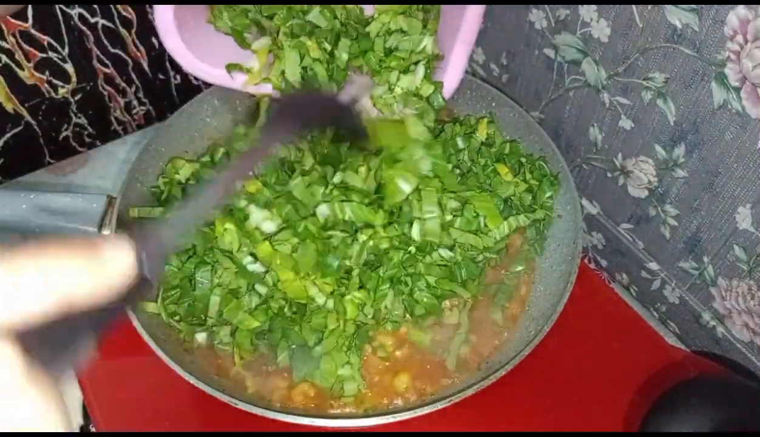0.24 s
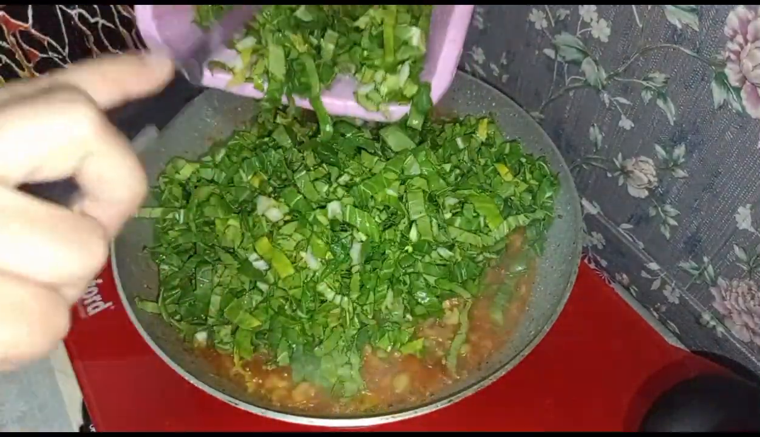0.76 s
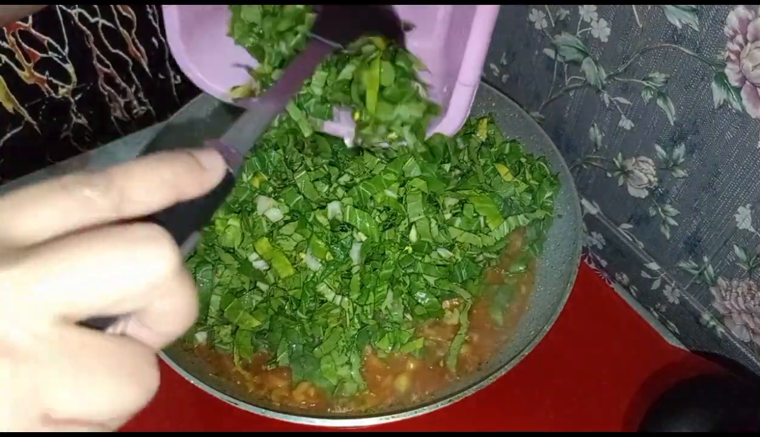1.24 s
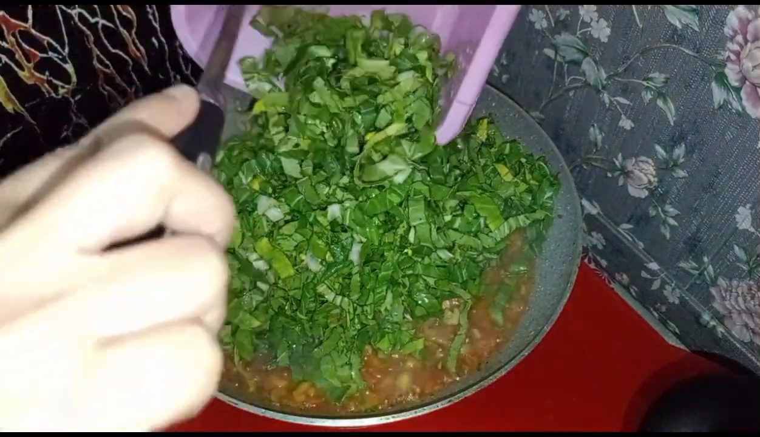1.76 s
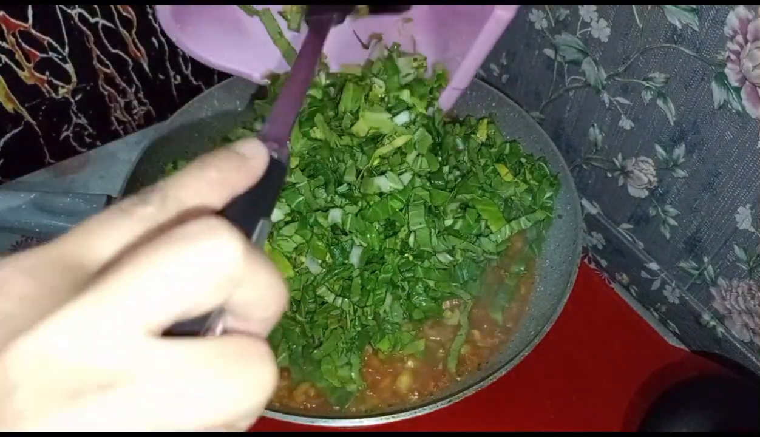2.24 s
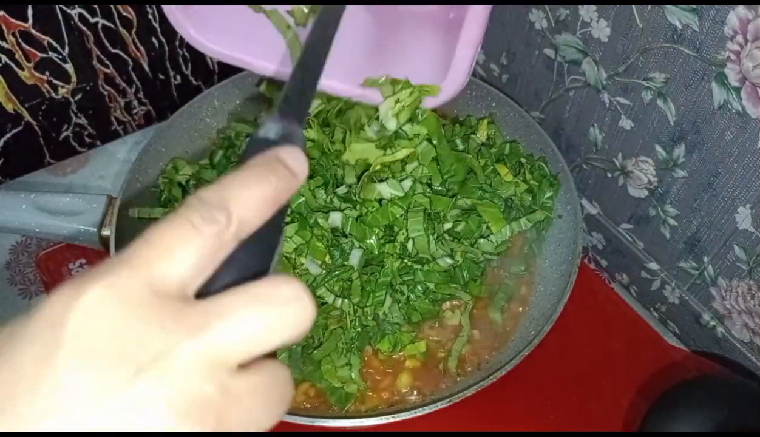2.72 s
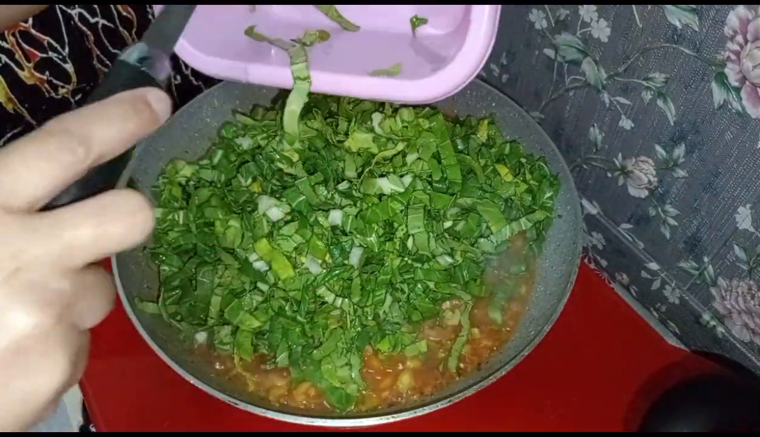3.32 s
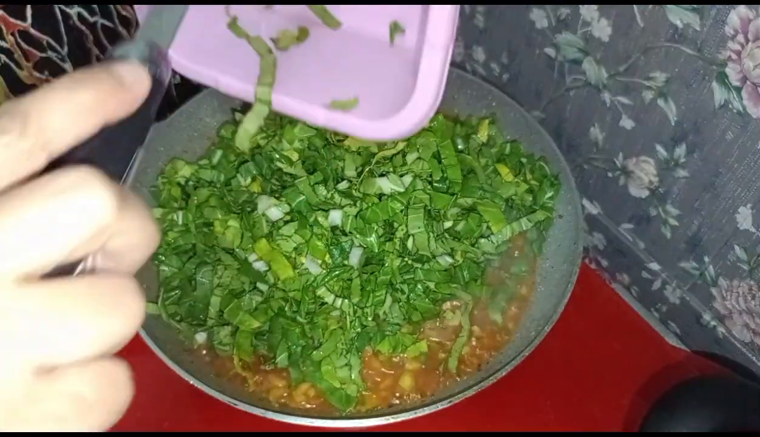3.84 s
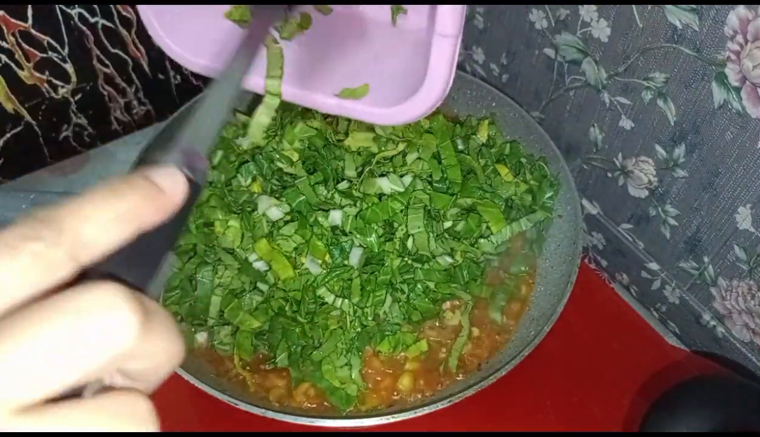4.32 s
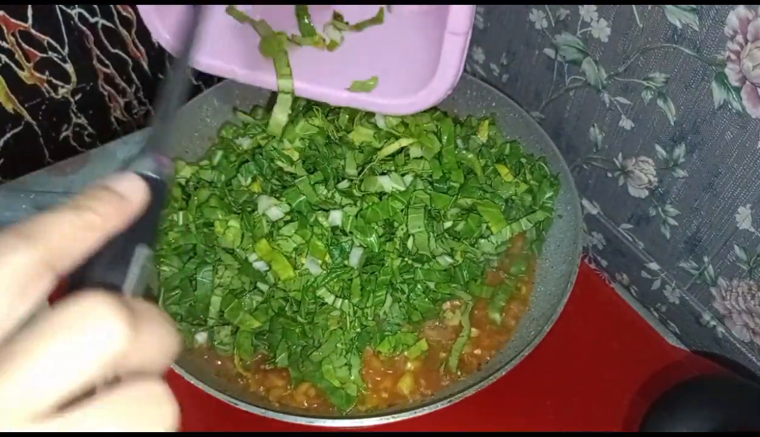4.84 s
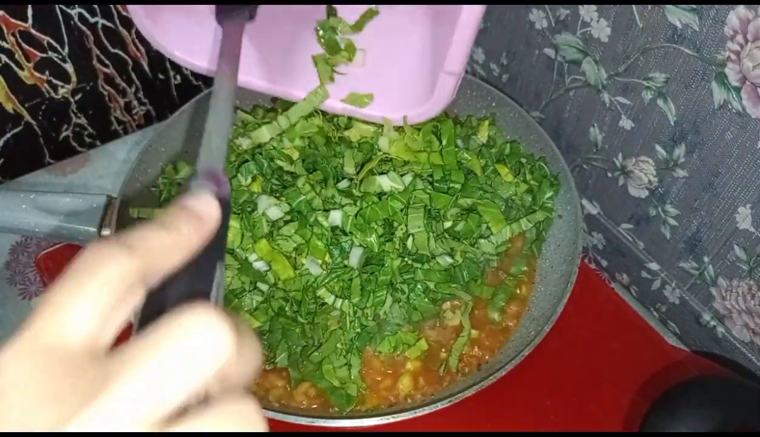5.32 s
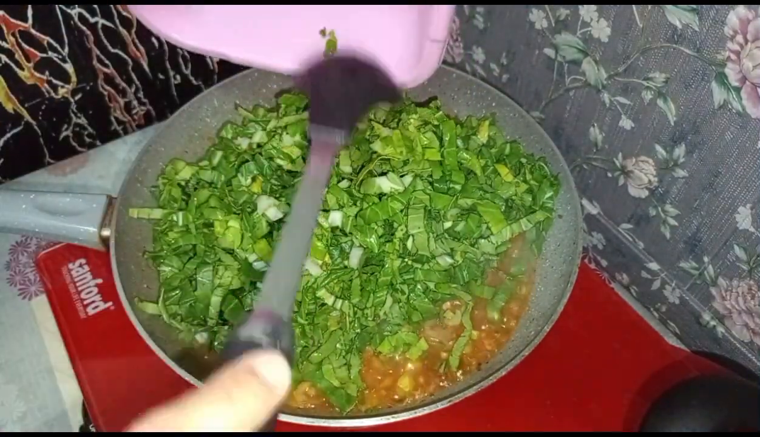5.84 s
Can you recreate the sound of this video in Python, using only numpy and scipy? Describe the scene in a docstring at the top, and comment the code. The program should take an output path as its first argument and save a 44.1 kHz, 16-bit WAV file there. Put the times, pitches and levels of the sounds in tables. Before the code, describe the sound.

Continuous bubbling sizzle with faint oil spits and a barely audible low hum. Over it, sharp dry plastic clacks and scraping strokes as leaves are pushed from a tub, with tiny squeaks and low handling rumbles. The knocks come unevenly, the hardest near the middle, then thin out. Close, mono, dry kitchen sound; automatic gain pushes the simmer down after each blow and peaks clip.

```python
"""A spatula knocks and scrapes chopped leaves out of a plastic tub into a pan of simmering sauce.
Each knock or scrape shakes the tub, which rings at a few pitches and soon goes quiet.
The pan's fizz is shaped noise and clicks; a faint stove hum, oil spits and leaf rustles are noise too.
Thin squeaks are short tones, and the swaying tub rumbles low.
The close microphone's gain control ducks the fizz after each knock and the loudest blows clip."""
import sys
import numpy as np
from scipy import signal
from scipy.io import wavfile
from scipy.ndimage import uniform_filter1d, minimum_filter1d

SR = 44100
rng = np.random.default_rng(int(sys.argv[2]) if len(sys.argv) > 2 else 0)


def put_to_file(sound):
    """Save the sound as 16-bit audio at rate SR, in the file named by the first command-line argument."""
    columns = np.atleast_2d(sound).T  # one column per channel
    safe = np.clip(columns, -1, 1)
    whole_steps = np.round(safe * 32767)
    wavfile.write(sys.argv[1], SR, whole_steps.astype(np.int16))


N = 267815  # length of the sound in samples


def amp(db):
    """Turn decibels into a plain multiplier."""
    return 10 ** (np.asarray(db) / 20)


def evened(x):
    """Scale a signal to an average (RMS) strength of 1."""
    return x / np.sqrt(np.mean(x ** 2) + 1e-20)


def curve(rows):
    """Join a table's rows with straight lines: each column after the time, at every sample."""
    s, *columns = np.transpose(rows)
    return [np.interp(np.arange(N) / SR, s, column) for column in columns]


def mode(x, hz, width):
    """One pitch at which a thing rings: a click starts a tone about 1 high; more width, faster fading."""
    radius = np.exp(-np.pi * width / SR)
    angle = 2 * np.pi * hz / SR
    return signal.lfilter([0, np.sin(angle)], [1, -2 * radius * np.cos(angle), radius ** 2], x)


def band(x, lo_hz, hi_hz):
    """Keep mainly the sound between two pitches."""
    return signal.sosfilt(signal.butter(2, [lo_hz, hi_hz], "bandpass", fs=SR, output="sos"), x)


def ring(x, hz, width):
    """A mode that only the part of the blow near its own pitch excites, so it swells in softly."""
    return mode(band(x, 0.865 * hz, 1.35 * hz), hz, width)


def clicks(per_s, spread_db):
    """Random clicks of either sign; a few are much larger."""
    size = amp(spread_db * np.minimum(rng.exponential(1, N), 5))
    signed = size * rng.choice([-1., 1.], N)
    return evened(signed * (rng.random(N) < per_s / SR))


# Simmer strength over time: t/s, level/dB, treble lift/dB (grows from 2.5 kHz, full from 5 kHz up)
SIMMER_STRENGTH = [(0, -18, -7), (.5, -16.5, -8.5), (1.2, -16, -8), (1.8, -17.5, -9.5), (2.4, -19, -7),
                   (3, -17.5, -10), (3.6, -19.5, -8), (4.2, -16.5, -9.5), (4.8, -18, -9.5),
                   (5.4, -24.5, -6), (6.07, -22, -7.5)]
# Broad colour of the fizz: f/Hz, relative level/dB per Hz
FIZZ_COLOUR = [(76, -72), (130, -22), (147, -16.5), (232, -28.5), (267, -30), (391, -19), (478, -28),
               (645, -17.5), (871, -15), (1750, -3), (2890, -11.5), (3130, -14.5), (9060, -27.5),
               (11500, -42), (15600, -43.5)]
# Resonances of the pan in the fizz: f/Hz, width/Hz, level/dB added at the peak
PAN_PEAKS = [(627.5, 57, 12.5), (1313, 33, 11), (1930, 130, 4.5), (3190, 56, 4), (4400, 42, 6.5),
             (6280, 980, 3), (8990, 700, 6.5), (15000, 1000, 13.5)]


def simmer():
    """Thousands of small bubbles burst each second, coloured by the pan, in drifting patches."""
    level_db, treble_db = curve(SIMMER_STRENGTH)
    bursts = clicks(5000, 1.0) + 1.44 * rng.standard_normal(N)
    # split the sound into pitches (rows) and short moments (columns)
    hz, t, z = signal.stft(bursts, SR, nperseg=512, noverlap=384)

    colour_hz, value_db = np.transpose(FIZZ_COLOUR)
    colour_db = np.interp(np.log(hz + 1), np.log(colour_hz), value_db, -55)
    for centre, width, db in PAN_PEAKS:
        colour_db += db / (1 + (2 * (hz - centre) / width) ** 2)

    patches = uniform_filter1d(rng.standard_normal(z.shape), 6, 0)  # smooth over pitch
    patches = evened(uniform_filter1d(patches, 9, 1))  # then over time
    depth_db = np.interp(hz, [2000, 5000], [1.4, 2.3])[:, None]  # the treble is patchier
    flicker = evened(uniform_filter1d(rng.standard_normal(len(t)), 6))
    treble_share = np.clip(np.log2((hz[:, None] + 1) / 2500), 0, 1)
    lift_db = np.interp(t * SR, np.arange(N), treble_db) * treble_share

    z = z * amp(colour_db[:, None] + depth_db * patches + 0.67 * flicker + lift_db)
    fizz = signal.istft(z, SR, nperseg=512, noverlap=384)[1][:N]
    return amp(level_db) * evened(fizz)


HUM_HZ, HUM_DB = 118.4, -50


def stove():
    """A narrow wavering hum: noise rings one low pitch."""
    return amp(HUM_DB) * evened(mode(rng.standard_normal(N), HUM_HZ, 6))


SPITS_PER_S, SPITS_DB = 25, -58


def spits():
    """Sparse droplets of oil snap: short, faint puffs of noise."""
    t = np.arange(900) / SR
    fade = amp(-60 * t / .015)  # 60 dB in 15 ms
    puffs = signal.oaconvolve(abs(clicks(SPITS_PER_S, 2.0)), fade)[:N]
    return amp(SPITS_DB) * evened(band(puffs * rng.standard_normal(N), 3500, 9000))


RUSTLES_PER_S, RUSTLES_DB = 26, -50  # all pitches together
# Pitches of the sliding leaves: f/Hz
RUSTLE_PITCHES = [3760, 4120, 5600, 5960]


def rustles():
    """Leaves slide at random and give brief fuzzy chirps at a few high pitches."""
    t, out = np.arange(2000) / SR, np.zeros(N)
    puff = t * amp(-60 * t / .06)  # swells, then fades
    for hz in RUSTLE_PITCHES:
        starts = abs(clicks(RUSTLES_PER_S / len(RUSTLE_PITCHES), 2.0))
        slides = signal.oaconvolve(starts, puff)[:N]
        out += slides * evened(mode(rng.standard_normal(N), hz, 150))
    return amp(RUSTLES_DB) * evened(out)


# Brief rings of the tub and thin squeaks as the blade sticks and slides:
# start t/s, length/s, f/Hz, level/dB at the peak
SQUEAK_TONES = [(0.039, 0.18, 6050, -33), (0.056, 0.039, 4350, -25), (0.358, .009, 3490, -6),
                (0.551, 0.0096, 288, 2.5), (0.5542, 0.012, 702.6, -1), (0.53, .029, 4480, -28),
                (0.574, 0.017, 740, -10), (0.591, 0.021, 699, -7), (0.616, 0.031, 705, -12),
                (0.733, 0.044, 198, -33), (0.943, 0.013, 780, -10), (0.959, 0.058, 515, -9.5),
                (0.96, 0.021, 773, -2.5), (1.01, 0.054, 198, -21), (1.115, .031, 4550, -25.5),
                (1.427, .027, 237.5, -8.5), (1.447, 0.049, 184, -20), (1.539, 0.027, 6300, -25),
                (1.541, 0.022, 360, -4), (1.545, 0.038, 5750, -25), (1.583, 0.049, 446, -18),
                (1.677, 0.077, 4470, -29), (1.73, .037, 6050, -32), (1.763, 0.028, 4450, -24),
                (1.793, 0.017, 4400, -30), (1.869, 0.018, 335, -3.5), (1.88, .06, 700, -28),
                (1.945, 0.015, 3996, -16.5), (1.952, 0.044, 4050, -24), (1.96, 0.088, 329, -27),
                (2.352, 0.033, 5570, -35), (2.367, 0.02, 3260, -9), (2.37, 0.038, 528, 5),
                (2.404, 0.084, 600, -16.5), (2.76, 0.021, 347.7, 1), (2.802, .022, 377, -2),
                (2.852, 0.021, 700, 6), (2.89, .011, 700, -6), (2.913, 0.048, 700, -2),
                (2.96, 0.014, 700, -2), (3.056, 0.018, 720, -6), (3.064, 0.037, 175.8, -13.5),
                (3.152, 0.017, 4270, -25), (3.181, .009, 1550, 2), (3.218, 0.091, 690, -19),
                (3.377, 0.037, 520, -5), (3.943, 0.03, 235, -16), (3.944, .05, 2990, -16),
                (4.051, .022, 319, -3), (4.245, 0.022, 515, -3.5), (4.281, .0049, 8500, -17),
                (4.373, 0.028, 700, 3), (4.405, 0.049, 694, -9.5), (4.629, 0.015, 4390, -21),
                (4.632, 0.041, 4130, -31.5), (5.323, .03, 372.6, -5.5), (5.333, 0.013, 2760, -9),
                (5.438, 0.05, 235, -17.5), (5.463, 0.12, 235, -27), (5.627, 0.061, 535, -17),
                (5.844, .011, 3500, -27), (6.007, 0.0077, 3010, 2.5), (6.0075, 0.018, 650, 0.5)]


def squeaks():
    """Short tones with soft ends; the higher ones waver more."""
    t, out = np.arange(N) / SR, np.zeros(N)
    for start, length, hz, db in SQUEAK_TONES:
        progress = np.clip((t - start) / length, 0, 1)
        swell = np.sin(np.pi * progress ** .7)
        waver = np.sqrt(hz / 5000) * evened(uniform_filter1d(rng.standard_normal(N), 250))
        out += amp(db) * swell * np.sin(2 * np.pi * hz * t + 0.68 * waver)
    return out


# Strokes along the tub, first pressure on each part:
# start t/s, length/s, then level/dB on floor, wall, corner, rim, lip, blade
RUBS = [(0.352, 0.12, -61, -57, -54, -34, -13, -14), (0.561, .11, -19.5, -17, -14, -18, -15.5, -24),
        (0.716, 0.072, -30, -41, -29, -16, -15, -30), (0.964, 0.12, -19, -31, -18, -2, -13.5, -28),
        (1.425, 0.12, -23, -37, -29, -21, -35, -42), (1.542, .11, -11.5, -14.5, -22.5, -10, -14, -22),
        (1.87, 0.13, -16, -17.5, -16.5, -11.5, -35, -25), (1.942, 0.16, -29.5, -38, -46, -30, -18.5, -22),
        (2.37, 0.16, -9.5, -19, -19.5, -8.5, -12, -24.5), (2.771, 0.17, -14.5, -9, -10.5, -9.5, -14, -55),
        (2.864, 0.17, -13.5, -13.5, -4.5, -5.5, -15.5, -25), (3.06, 0.15, -28, -12, -9, -6, -36, -44),
        (3.175, 0.15, -23, -15.5, -21.5, -13.5, -17.5, -44),
        (3.364, 0.09, -15.5, -14, -43, -18, -17, -56.5), (3.511, 0.17, -30, -28, -42, -47, -35, -37),
        (3.695, 0.086, -19, -15, -28.5, -12.5, -16.5, -23.5), (3.945, .08, -21, -56, -32, -15, -5, -21),
        (4.058, 0.087, -10, -12, -16.5, -12, -22, -48), (4.224, 0.13, -13, -8.5, -30, -5.5, -5, -19.5),
        (4.308, 0.17, -12, -9, -4.5, -6.5, -19, -20.5), (4.481, 0.096, -28.5, -18, -46, -28, -17, -48),
        (4.584, 0.067, -32, -50, -26, -8.5, -12.5, -37), (5.326, 0.12, -14.5, -5.5, -9.5, -7, -11.5, -47),
        (5.43, 0.39, -38, -48, -38, -24.5, -21, -38), (5.633, 0.13, -50, -25, -31, -13.5, -16.5, -86),
        (6.007, 0.13, -13, -11, -14.5, -20, -9.5, -14)]
# How each part (same order) eases off in a stroke: fall by the end/dB, bend (under 1 early, over 1 late)
PART_EASING = [(-28.5, 1.46), (-31.5, 1.67), (-31, 2.6), (-27.5, 0.88), (-13.5, 0.57), (-27.5, 1.16)]
TOUCH_S = 0.0016  # time the blade takes to press on


def eased():
    """Rubbing level of each part in dB: a quick touch, then a fall at the part's own pace."""
    t = np.arange(N) / SR
    level_db = np.full((len(PART_EASING), N), -80.)
    fall_db, bend = np.transpose(PART_EASING)[:, :, None]
    for start, length, *parts_db in RUBS:
        on = slice(round((start - TOUCH_S) * SR), round((start + length) * SR))
        progress = np.clip((t[on] - start) / length, 0, 1)
        touch_db = 40 * np.minimum((t[on] - start) / TOUCH_S, 0)
        stroke_db = np.c_[parts_db] + fall_db * progress ** abs(bend) + touch_db
        level_db[:, on] = np.maximum(level_db[:, on], stroke_db)
    return level_db


# Ringing modes of floor, wall, corner, rim and lip of the tub and of the blade, one list a part:
# f/Hz, width/Hz (as knocked; rubbing narrows it), level/dB relative to the other modes
TUB_MODES = [
    [(171.7, 90, -2), (231.8, 52, 4.5), (302.3, 64, 2), (365, 19, -3.5)],
    [(505.4, 61, 5.5)],
    [(687.4, 95, 5), (749, 74, 2), (887, 97, 0.5)],
    [(1423.6, 53, 6.5), (1490, 170, 10)],
    [(1950, 230, 15), (2577, 53, 4), (2842, 180, 5)],
    [(3303, 375, 14), (3605, 99, 10.5), (4400, 88, -6), (4265, 43, -3.5)],
]


def strokes():
    """The blade edge slips unevenly and keeps the modes of each part it rubs ringing."""
    out = np.zeros(N)
    fall = np.arange(N) * 1000.0 / SR  # the modes ring out after the blade lifts, dB
    for level_db, part in zip(eased(), TUB_MODES):
        level_db = np.maximum.accumulate(level_db + fall) - fall
        slips = clicks(400, 1.5) + 0.42 * rng.standard_normal(N)
        rubbed = np.zeros(N)
        for hz, width, db in part:
            rubbed += amp(db) * evened(ring(slips, hz, 0.59 * width))
        rubbed = evened(rubbed)
        # divide by part of the smoothed strength, so each stroke rings more steadily
        steadier = rubbed / (uniform_filter1d(rubbed ** 2, 700) + .05) ** 0.11
        out += amp(level_db) * evened(steadier)
    return out


# Blows: t/s, force level/dB over the rubbing that follows, crack level/dB,
# hardness/dB gained from each part to the next (floor, wall, corner, rim, lip, blade)
BLOWS = [(0.359, -14, -19, 2.5), (0.5537, 5.5, -17, -0.16), (0.9444, 9, -18, -1.8), (0.9637, -6.5, -5, 1),
         (1.5441, -2, 4, 0), (1.6104, -7, -33, 1.5), (1.696, -16, -1, 3), (1.8503, 5.5, -4, 1.5),
         (1.8682, 2, -22, 1.1), (1.949, -5, -4, 3), (1.96, -0.5, -19, 2.5), (2.3695, 1, -8, 0.65),
         (2.7464, -4, -22, 0.7), (2.7626, 2, -3, 0.4), (2.8547, 11, 8, 0.07), (3.0599, 5, 2, 0.4),
         (3.1847, 5.5, 1, 0.5), (3.3565, -4, -4, 1.4), (3.5732, -11.5, -5, 3), (3.6908, -9, -12.5, 1.3),
         (3.7244, 1, -14, 0.8), (3.9445, -6.5, -5, 0.2), (4.0547, 2.5, -11, -2.8), (4.2246, -3.5, -6, 0.1),
         (4.3129, 5, 2, .3), (4.4818, 4, -21, -1), (4.5837, -5.5, -37, 1.3), (4.9352, -8, -18, 1.5),
         (5.3262, -11, 3, -0.2), (5.641, -12, -23, 1.1), (6.0086, -1, -1, 0.3)]
# How much harder a blow drives each part than rubbing, before force and hardness: level/dB, same order
BLOW_OVER_RUB = [4, -11.5, 9.5, 2.5, 3, 2]
# Least rubbing level counted for each part, for a light tap that starts no stroke: level/dB, same order
LIGHT_TAP = [-32, -35, -37, -26, -24.5, -31]
SETTLE_S = .008  # from the blow to the rubbing it starts


def knocks():
    """Each blow cracks, then chatters as it fades, driving the parts that its stroke goes on to rub."""
    t, rubbing_db = np.arange(1500) / SR, eased()
    chatter = rng.standard_normal((len(BLOWS), len(t))) * amp(-27.5 - 60 * t / 0.069)
    chatter[:, 0] = 1  # the hit itself
    drive = np.zeros((len(TUB_MODES) + 1, N + len(t)))  # row 0 is the crack, then one row a part
    for (s, force_db, crack_db, hard_db), blow in zip(BLOWS, chatter):
        at = round(s * SR)
        following_db = np.maximum(rubbing_db[:, at + round(SETTLE_S * SR)], LIGHT_TAP)
        parts_db = following_db + BLOW_OVER_RUB + force_db + hard_db * np.arange(len(TUB_MODES))
        drive[:, at:at + len(t)] += amp(np.r_[crack_db, parts_db])[:, None] * blow

    out = band(drive[0, :N], 4500, 9200)
    for part_drive, part in zip(drive[1:], TUB_MODES):
        for hz, width, db in part:
            out += amp(db) * ring(part_drive[:N], hz, width)
    return out


# The tub sways in the hand and rumbles: middle t/s, length/s, level/dB at the middle
SWAYS = [(1.0, .1, -42), (1.165, 0.22, -32.5), (1.32, .1, -31), (1.424, 0.17, -39), (1.637, 0.3, -32),
         (2.104, 0.13, -32), (2.93, 0.15, -36.5), (3.093, 0.28, -29.5), (3.26, 0.24, -28.5),
         (3.395, 0.15, -26), (3.51, 0.2, -36), (3.714, 0.34, -30), (3.873, 0.15, -34), (5.682, 0.064, -41)]


def sway():
    """Low lumpy noise around the tub's slowest flexing, one swell for each sway."""
    t, swells = np.arange(N) / SR, np.zeros(N)
    for middle, length, db in SWAYS:
        swells += amp(db) * np.cos(np.pi * np.clip((t - middle) / length, -.5, .5)) ** 2
    rumble = ring(mode(rng.standard_normal(N), 92, 25), 77.5, 40)
    return swells * evened(rumble)


def scene():
    """All the sounds added together, as one channel."""
    pan = simmer() + stove() + spits()
    tub = rustles() + squeaks() + strokes() + knocks() + sway()
    return (pan + tub)[None]


EDGE_HZ = 15650  # almost nothing passes far above this


def record(dry):
    """Gain control falls quickly, holds briefly and recovers; peaks clip; then the band limit."""
    power_db = 10 * np.log10(abs(uniform_filter1d(dry[0] ** 2, 500)) + 1e-12)
    held_db = -minimum_filter1d(-power_db, size=4001, origin=2000)  # the loudest of the last 90 ms
    rise = np.arange(N) * 42.0 / SR  # the held level sinks by 42 dB a second
    sinking_db = np.maximum.accumulate(held_db + rise) - rise
    over_db = np.maximum(sinking_db + 18.5, 0)  # ducking starts above -18.5 dB
    duck_db = 0.41 * uniform_filter1d(over_db, 300, origin=100)
    high_passed = signal.lfilter(*signal.butter(1, 45, "high", fs=SR), dry)
    ducked = high_passed / amp(duck_db)
    clipped = np.clip(1.15 * np.tanh(ducked / 1.15), -1, 1)
    lowpass = signal.firwin(511, EDGE_HZ, window=("kaiser", 9), fs=SR)
    return signal.oaconvolve(clipped, lowpass[None], "same")


dry = scene()
out = record(dry)
put_to_file(out)
```